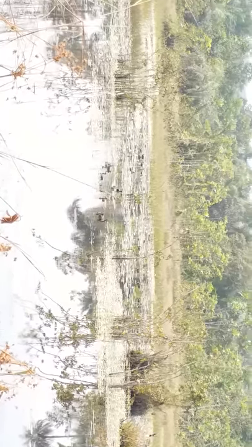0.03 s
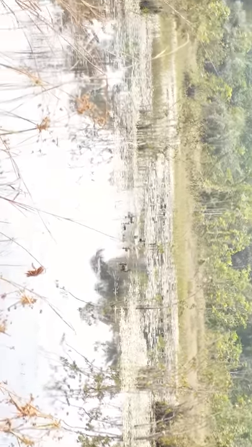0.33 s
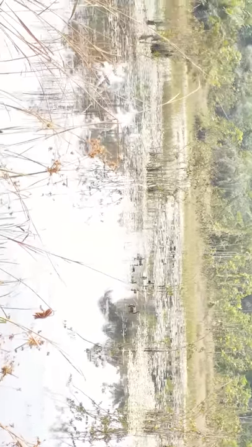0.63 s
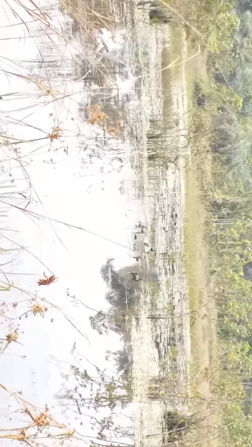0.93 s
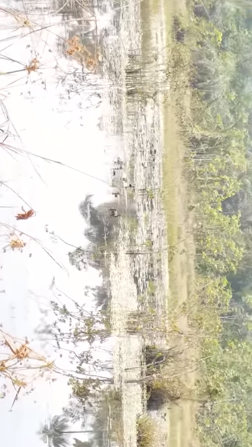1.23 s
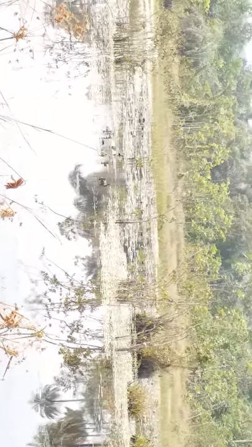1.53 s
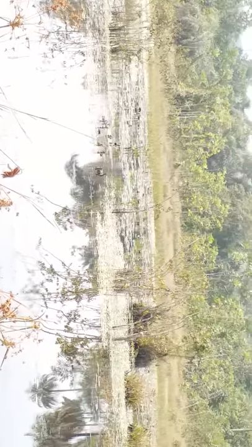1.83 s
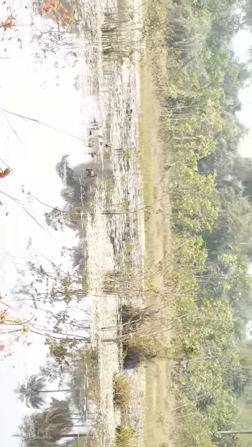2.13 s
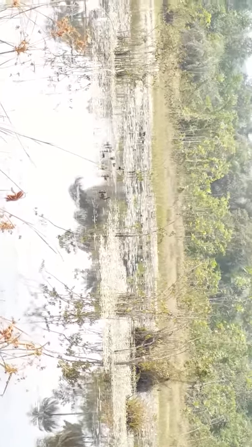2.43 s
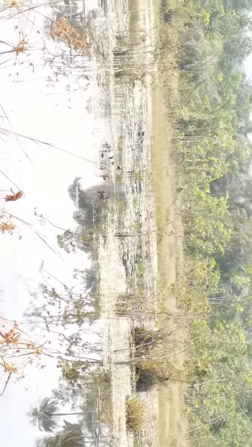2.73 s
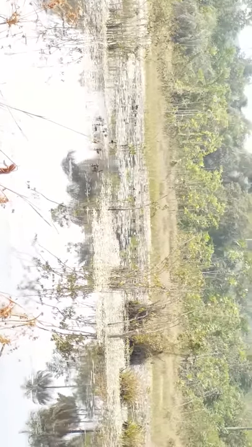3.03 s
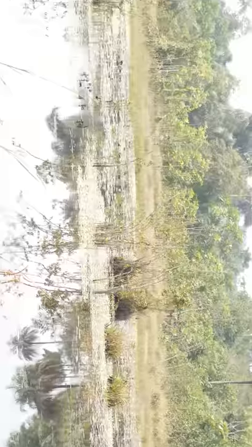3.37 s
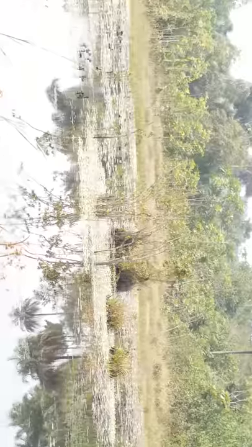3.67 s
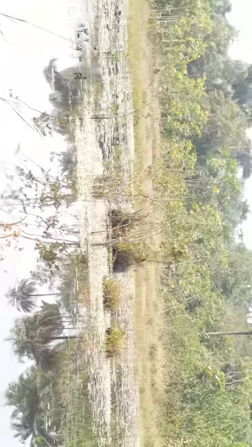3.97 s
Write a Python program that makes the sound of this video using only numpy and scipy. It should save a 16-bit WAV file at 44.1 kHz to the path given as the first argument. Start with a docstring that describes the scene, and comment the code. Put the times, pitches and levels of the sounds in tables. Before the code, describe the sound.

Heard from a wetland bank, a sharp tick comes first, then ducks whistle three wavering, rising and falling calls. Ticks and hollow knocks keep going, while a far engine drones and a small bird pipes faintly.

```python
"""A wetland, heard in stereo from the bank. From the start there is open air, a narrow hiss of insects,
a rustle close to the microphone and a far engine that drones and clatters with each turn of its shaft.
Dry ticks and tiny clicks set in at once, the ticks alternating with dull knocks. A small bird pipes
faintly. From half a second in, whistling ducks give three calls of three arched notes, shaped by the
throat and echoed by water, reeds and trees. Near the end the small bird pipes again."""
import sys
import numpy as np
from scipy import signal
from scipy.fft import rfft, irfft, next_fast_len
from scipy.io import wavfile
from scipy.ndimage import uniform_filter1d, map_coordinates

SR = 44100
rng = np.random.default_rng(int(sys.argv[2]) if len(sys.argv) > 2 else 0)


def persist_wave(psi):
    """Save psi, clipped to +-1, as 16-bit WAV."""
    counts = np.round(np.clip(psi, -1, 1) * 32767).astype(np.int16)
    wavfile.write(sys.argv[1], SR, np.atleast_2d(counts).T)


N = 176400

# how alike noise is in the left and right channels: frequency_hz, correlation
STEREO_LIKENESS = [(100, .9995), (250, 1), (500, 0.98), (1000, 0.75), (2500, 0.87), (8000, 0.93)]
# spectra of the open air, the insects and the close rustle: frequency_hz, gain_db
AIR_SPECTRUM = [(20, -15), (42, -19), (70, -6.5), (120, -1), (220, -0.5), (360, 0), (470, -10.5), (680, -8),
                (950, -16), (1500, -20.5), (2600, -24.5), (4200, -32), (6500, -40), (11000, -45),
                (15500, -45.5)]
INSECT_SPECTRUM = [(6800, -51), (7700, -7), (8350, 5.5), (8850, 4), (9400, -10.5), (10300, -17.5),
                   (12500, -26)]
RUSTLE_SPECTRUM = [(1500, 6), (2800, 0), (4300, 5.5), (5200, -6.5), (6300, -4), (8000, 1), (10500, -3),
                   (12200, -22)]
# the rustle's swells: time_s, level_db
RUSTLE_SWELLS = [(0, -61), (.24, -56.5), (.5, -55), (.75, -74), (1.15, -69), (1.6, -55.5), (1.95, -67),
                 (2.199, -92), (3.1, -75), (3.45, -63.5), (4, -91)]
AIR_DB, INSECT_DB = -46.5, -63

# the far engine's low tones: pitch_hz, level_db
DRONE_TONES = [(59.8, -50), (89.7, -46), (114.8, -43.5), (119.6, -44), (149.5, -50), (161.4, -54.5),
               (229.5, -55), (239.2, -56.5), (243.6, -51), (269.1, -57.5)]
# spectrum of its clatter: frequency_hz, gain_db
CLATTER_SPECTRUM = [(500, -30), (750, 18), (1200, -12), (1850, 16.5), (2300, -14.5), (4000, 0.5),
                    (7000, -17)]
DRONE_DRIFT_SHARE, DRONE_WAVER_DB = 0.00396, 1.26
SHAFT_HZ, CLATTER_DB, CLATTER_SWING_DB = 29.9, -63.5, 14

# dry ticks: start_s, level_db, t60_s
TICK_HITS = [(0.011, -23.5, 0.034), (.211, -44, 0.035), (.309, -38, 0.071), (0.953, -39.5, 0.088),
             (1.603, -37.5, 0.062), (2.231, -38.5, 0.065), (2.871, -38.5, 0.1), (3.301, -47.5, 0.047),
             (3.52, -37, 0.061), (3.629, -49, 0.066), (3.857, -47, 0.14)]
# tiny bright clicks and dull knocks: start_s, level_db
CLICK_HITS = [(0.01, -43), (2.4, -43), (2.42, -43), (2.548, -45.5), (3.859, -39.5)]
KNOCK_HITS = [(.021, -34.5), (.632, -35.5), (1.274, -36.5), (1.922, -35.5), (2.554, -36.5), (3.203, -35.5),
              (3.841, -36)]
# spectra of the noise in a tick, a click and a knock: frequency_hz, gain_db
TICK_SPECTRUM = [(400, 5), (1100, 4.5), (2000, -1.5), (2800, -1), (4100, 3.5), (5500, -6.5), (7000, -15.5),
                 (10500, -9), (13000, -32)]
CLICK_SPECTRUM = [(5000, -55), (7700, 7.5), (10000, 2), (14000, -23)]
KNOCK_SPECTRUM = [(250, -21), (600, 9.5), (1000, -8.5), (4000, -18.5), (8000, -28), (15000, -40)]
# the modes that ring in a knock: pitch_hz, gain_db, t60_s
HOLLOW_MODES = [(459.6, -10, 0.17), (539.7, -0.5, 0.078), (597.4, -4.5, 0.12), (688.7, -10.5, 0.085)]
TICK_RISE_S, CLICK_RISE_S, CLICK_T60_S = 0.00087, 0.00028, 0.016
KNOCK_RISE_S, PUFF_T60_S, PUFF_DB = 0.0017, 0.1, -2.5

# the small bird's notes: start_s, length_s, pitch_hz, level_db
BIRD_PIPES = [(0.387, 0.045, 4420, -53.5), (1.366, 0.06, 4740, -48), (3.672, 0.345, 4030, -66.5),
              (3.958, 0.074, 3910, -66)]
PIPE_DROOP_SHARE = 0.02
TREE_T60_S, TREE_BUILD_S, REED_T60_S = 0.84, 0.014, 0.12

# the contours the three duck calls aim for: time_s, pitch_hz, relative_level_db
CALL_ONE = [(0.48, 2646, -54), (0.515, 2766, -47.5), (0.54, 3270, -44.5), (0.565, 3600, -46.5),
            (0.59, 4207, -42.5), (0.612, 4480, -43.5), (0.64, 4457, -40), (0.665, 4000, -49),
            (0.683, 2760, -52), (0.698, 2085, -60), (0.718, 2230, -51), (0.742, 3423, -40),
            (0.765, 3715, -45), (0.8, 3996, -37), (0.835, 4410, -42), (0.862, 3688, -60),
            (0.884, 2680, -40.5), (0.905, 3464, -43), (0.93, 3683, -44.5), (0.96, 3530, -42.5),
            (0.99, 3165, -43), (1.02, 2620, -44.5), (1.05, 2000, -56)]
CALL_TWO = [(1.201, 2450, -57), (1.232, 3267, -43.5), (1.262, 3970, -52.5), (1.291, 4606, -49),
            (1.315, 4700, -61), (1.35, 4630, -50), (1.372, 3500, -57), (1.395, 2408, -65),
            (1.427, 2300, -59), (1.442, 3200, -45), (1.457, 3880, -46), (1.48, 4150, -57), (1.5, 4530, -43),
            (1.528, 4670, -52), (1.548, 3530, -53.5), (1.575, 2250, -53), (1.604, 3605, -43),
            (1.632, 4134, -55), (1.652, 4500, -46.5), (1.68, 4506, -53), (1.708, 3866, -46.5),
            (1.765, 4005, -51.5), (1.81, 3650, -46.5), (1.86, 3127, -49), (1.915, 2330, -58)]
CALL_THREE = [(2.53, 3200, -66), (2.561, 3600, -41), (2.574, 4400, -53), (2.63, 5950, -59),
              (2.642, 5900, -56), (2.667, 3600, -40), (2.683, 3200, -47.5), (2.698, 3780, -39.5),
              (2.709, 4350, -52), (2.725, 4680, -41.5), (2.76, 5550, -43), (2.768, 6080, -64),
              (2.788, 5250, -50), (2.803, 4570, -63), (2.823, 3200, -41.5), (2.834, 3900, -36.5),
              (2.85, 4450, -52.5), (2.885, 4706, -37), (2.92, 4805, -63), (2.957, 4710, -42),
              (2.982, 4586, -59.5), (3.03, 3700, -48), (3.062, 2700, -62)]
# each call's timbre and place:
# harmonic_2_db, harmonic_3_db, harmonic_4_db, rolloff_hz, left_over_right_db, reeds_db, trees_db
CALL_VOICES = [(-12.5, -6, -21, 10770, 4, -9, -8), (-10, -1, -7.5, 12100, 2, -1.5, -5.5),
               (-21, -42, -50, 11000, 2, -9.5, -13.5)]
# resonances of the duck's throat and bill: frequency_hz, gain_db
THROAT_RESPONSE = [(2000, 3), (2600, -4), (3400, 7.5), (4600, 3.5), (5600, 14.5), (6300, 7), (7200, -6.5),
                   (8200, -1), (9300, 3.5), (12000, 0.5), (15000, 3)]
CALL_DB, CALL_FADE_S, WEAK_BELOW_HZ = -1, 0.006, 2300
JITTER_SHARE, JITTER_PER_S, FLUTTER_DB, FLUTTER_PER_S = 0.00497, 600, 3.5, 170
LOCK_HZ, LOCK_WIDTH_HZ, LOCK_PULL = 5335, 390, 0.92
RISE_BRIGHT_DB, RISE_HZ_PER_S = 0.5, 9700

BAND_LIMIT_HZ = 15800


def amp(db):
    """Decibels to gain."""
    return 10 ** (np.asarray(db) / 20)


def unit(x):
    """Scaled to rms 1."""
    return x / np.sqrt(np.mean(x ** 2) + 1e-20)


def clock():
    """The time of each sample in seconds."""
    return np.arange(N) / SR


def along(points, hz):
    """Read (frequency_hz, value) points on a log frequency axis."""
    point_hz, values = np.transpose(points)
    return np.interp(np.log(hz + 1), np.log(point_hz + 1), values)


def wobble(per_s):
    """A smooth random curve with per_s knots a second."""
    return map_coordinates(rng.standard_normal(int(N * per_s / SR) + 4), [clock() * per_s])


def filtered(x, response):
    """Shape x by a gain that depends on frequency."""
    size = next_fast_len(N + SR // 2)
    return irfft(rfft(x, size) * response(np.fft.rfftfreq(size, 1 / SR)), size)[..., :N]


def pan(db):
    """Channel gains that put the left db above the right."""
    return amp(np.array([[db], [-db]]) / 2)


def noise(spectrum):
    """Coloured stereo noise of rms 1, nearly mono in the bass."""
    def mid_side_gains(hz):
        angle = np.arccos(np.clip(along(STEREO_LIKENESS, hz), -1, 1)) / 2
        return amp(along(spectrum, hz)) * [np.cos(angle), np.sin(angle)]
    mid, side = filtered(rng.standard_normal((2, N)), mid_side_gains)
    return unit(np.array([mid + side, mid - side]))


def wetland():
    """Open air all round; a little to the left, the insects' hiss and a soft, close rustle."""
    air = amp(AIR_DB + 0.92 * wobble(12)) * noise(AIR_SPECTRUM)
    insects = amp(INSECT_DB + 1.1 * wobble(57)) * noise(INSECT_SPECTRUM) * pan(3.3)
    swell_db = np.interp(clock(), *np.transpose(RUSTLE_SWELLS))
    rustle = amp(swell_db + 2.5 * wobble(35.6)) * noise(RUSTLE_SPECTRUM) * pan(1.9)
    return air + insects + rustle


def engine():
    """Far off, low tones beat together and a clatter swells with each shaft turn."""
    drone = np.zeros(N)
    for hz, db in DRONE_TONES:
        gain = amp(db + DRONE_WAVER_DB * wobble(7))
        cycles = rng.random() + hz * np.cumsum(1 + DRONE_DRIFT_SHARE * wobble(4.91)) / SR
        drone += gain * np.sqrt(2) * np.sin(2 * np.pi * cycles)
    shaft_angle = 2 * np.pi * SHAFT_HZ * clock()
    clatter = unit(noise(CLATTER_SPECTRUM) * amp(CLATTER_SWING_DB * np.cos(shaft_angle)))
    return drone + amp(CLATTER_DB) * clatter


def burst(start_s, db, rise_s, t60_s):
    """The envelope of one blow: a quick rise, and a fall of 60 dB in t60_s."""
    age = np.maximum(clock() - start_s, 0)
    return amp(db - 60 * age / t60_s) * (1 - np.exp(-age / rise_s))


def ticks_and_clicks():
    """Short bursts of noise: dry ticks a little to the left, and tiny bright clicks close by."""
    ticks = sum(burst(start_s, db, TICK_RISE_S, t60_s) for start_s, db, t60_s in TICK_HITS)
    clicks = sum(burst(start_s, db, CLICK_RISE_S, CLICK_T60_S) for start_s, db in CLICK_HITS)
    return ticks * noise(TICK_SPECTRUM) * pan(2) + clicks * noise(CLICK_SPECTRUM)


def knocks():
    """A little to the right, each knock rings a few short, hollow modes under a puff of noise."""
    ring, puffs = np.zeros((2, N))
    for start_s, db in KNOCK_HITS:
        for hz, mode_db, t60_s in HOLLOW_MODES:
            detuned_hz = hz * (1 + 0.0048 * rng.standard_normal())
            mode = np.sqrt(2) * np.sin(2 * np.pi * detuned_hz * (clock() - start_s))
            ring += burst(start_s, db + mode_db, KNOCK_RISE_S, t60_s) * mode
        puffs += burst(start_s, db + PUFF_DB, KNOCK_RISE_S, PUFF_T60_S)
    return (ring + puffs * noise(KNOCK_SPECTRUM)) * pan(-2.2)


def small_bird():
    """Thin, faint pipes that sag in pitch at both ends, with a little echo from the trees."""
    pipes = np.zeros(N)
    for start_s, length_s, hz, db in BIRD_PIPES:
        position = np.clip(2 * (clock() - start_s) / length_s - 1, -1, 1)  # -1 to 1 across the note
        pitch = hz * (1 - PIPE_DROOP_SHARE * position ** 2)
        envelope = amp(db + 4.1 * wobble(45)) * (1 - position ** 2)
        pipes += envelope * np.sin(2 * np.pi * np.cumsum(pitch) / SR)
    return pipes + amp(-15) * echo(pipes, TREE_T60_S, TREE_BUILD_S, spread=0.55)


def echo(x, t60_s, build_s, spread):
    """Scattered reflections build up and die away at the microphone; spread sets their width."""
    t = np.arange(SR) / SR
    mid, side = rng.standard_normal((2, SR)) * amp(-60 * t / t60_s) * (1 - np.exp(-t / build_s))
    tail = np.array([mid + spread * side, mid - spread * side])
    return signal.fftconvolve(x[None], tail / np.linalg.norm(tail[0]), axes=1)[:, :N]


def duck_glide(times_s, hz):
    """The pitch of a call clings to a throat resonance as it passes, then jumps free."""
    aim_hz = uniform_filter1d(np.interp(clock(), times_s, hz), size=400)
    offset_hz = aim_hz - LOCK_HZ
    return aim_hz - LOCK_PULL * offset_hz / (1 + np.abs(offset_hz / LOCK_WIDTH_HZ) ** 20)


def duck_whistle(call, overtones_db, rolloff_hz):
    """A gliding, shaky tone whose harmonics flutter and sweep through the throat's resonances."""
    t = clock()
    times_s, hz, db = np.transpose(call)
    glide = duck_glide(times_s, hz)
    # a quick upward glide is forced and slightly brighter
    force_db = RISE_BRIGHT_DB * np.tanh(np.gradient(glide) * SR / RISE_HZ_PER_S)
    pitch = glide * (1 + JITTER_SHARE * wobble(JITTER_PER_S))
    phase = 2 * np.pi * np.cumsum(pitch) / SR
    harmonics_db = [0] + [level + force_db for level in overtones_db]
    gains = np.array([amp(level + along(THROAT_RESPONSE, k * pitch)) / (1 + (k * pitch / rolloff_hz) ** 20)
                      for k, level in enumerate(harmonics_db, 1)])
    gains /= np.linalg.norm(gains, axis=0)  # the throat changes colour, not power
    tone = np.sqrt(2) * sum(gain * amp(FLUTTER_DB * wobble(FLUTTER_PER_S)) * np.sin(k * phase)
                            for k, gain in enumerate(gains, 1))
    gate = np.clip(np.minimum(t - times_s[0], times_s[-1] - t) / CALL_FADE_S + 1, 0, 1)
    strength = 1 / (1 + (WEAK_BELOW_HZ / pitch) ** 10)  # the voice gives out at low pitch
    return tone * gate * strength * amp(CALL_DB + np.interp(t, times_s, db))


def ducks():
    """Each call arrives directly, then dulled off the near water and reeds, and later from the trees."""
    out = np.zeros((2, N))
    dulling = [(4000, 0.0), (7000, -3), (12000, -6.5)]  # frequency_hz, gain_db
    for call, settings in zip([CALL_ONE, CALL_TWO, CALL_THREE], CALL_VOICES):
        *overtones_db, rolloff_hz, pan_db, reeds_db, trees_db = settings
        voice = duck_whistle(call, overtones_db, rolloff_hz)
        dulled = filtered(voice, lambda hz: amp(along(dulling, hz)))
        reeds = amp(reeds_db) * echo(dulled, REED_T60_S, build_s=0.0015, spread=0.62)
        trees = amp(trees_db) * echo(dulled, TREE_T60_S, TREE_BUILD_S, spread=0.21)
        out += pan(pan_db) * (voice + reeds + trees)
    return out


def scene():
    """Everything that reaches the microphone on the bank."""
    return wetland() + engine() + ticks_and_clicks() + knocks() + small_bird() + ducks()


def record(dry):
    """The recorder keeps nothing above its band limit."""
    return filtered(dry, lambda hz: hz < BAND_LIMIT_HZ)


dry = scene()
out = record(dry)
persist_wave(out)
```